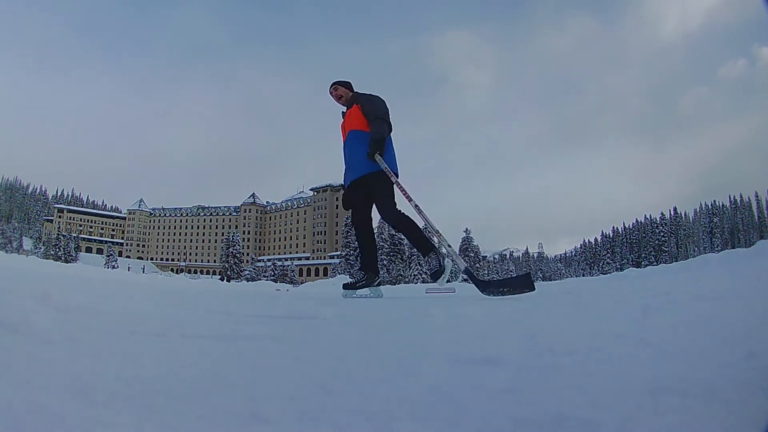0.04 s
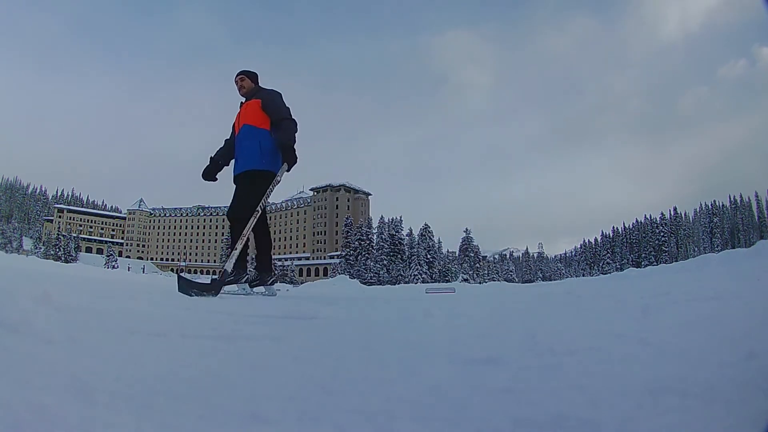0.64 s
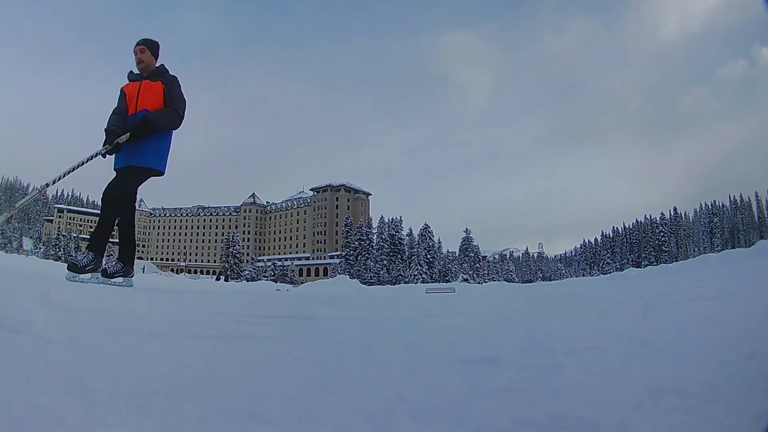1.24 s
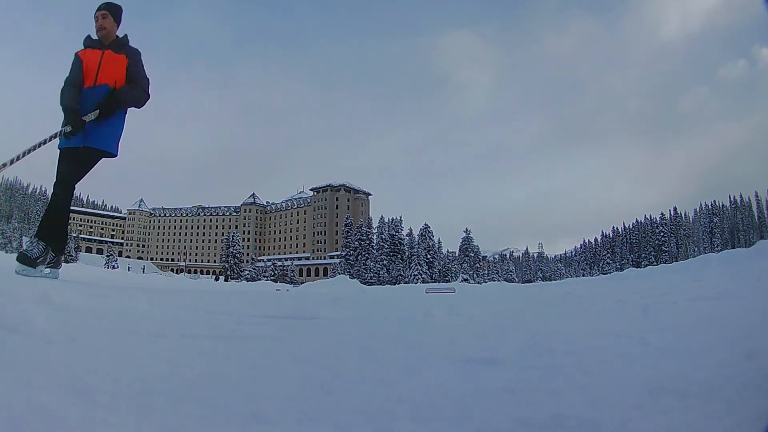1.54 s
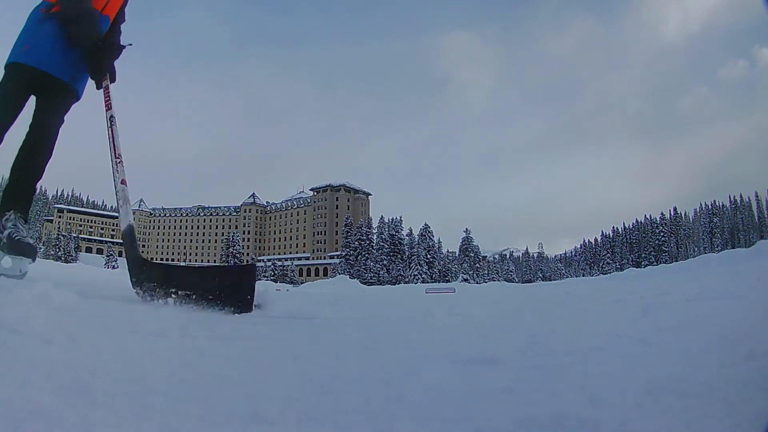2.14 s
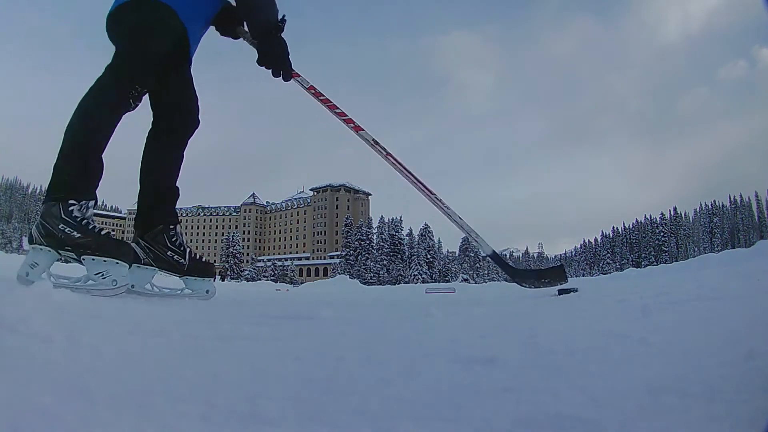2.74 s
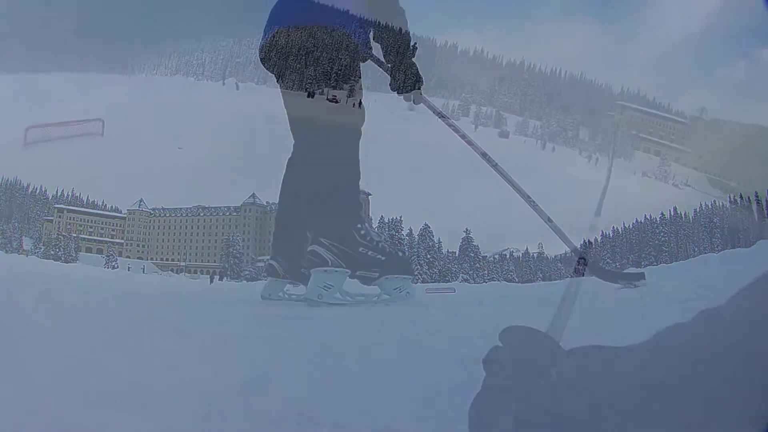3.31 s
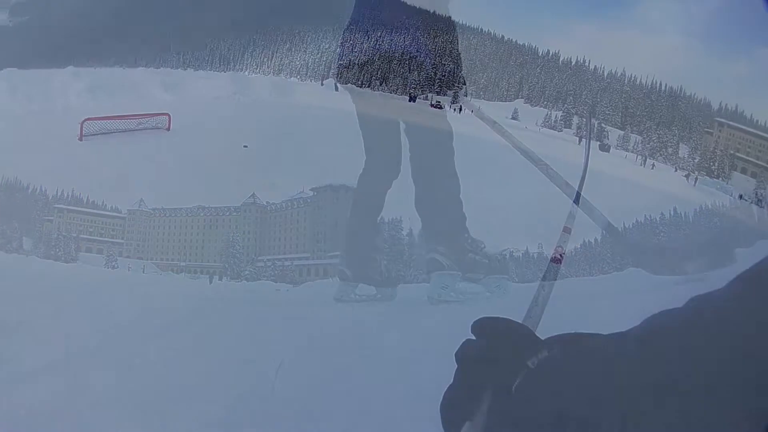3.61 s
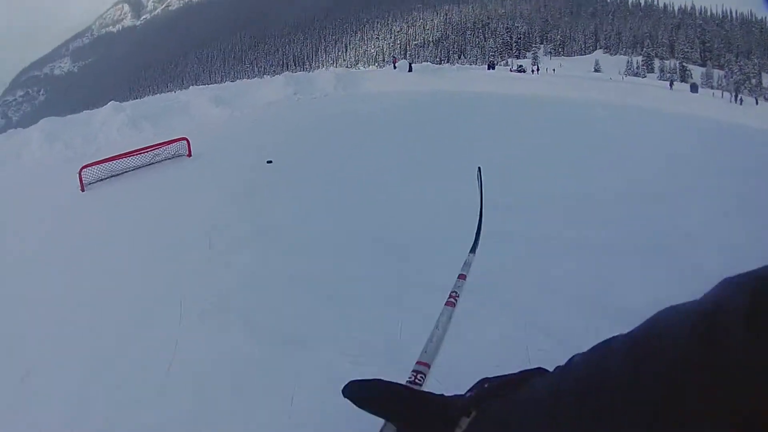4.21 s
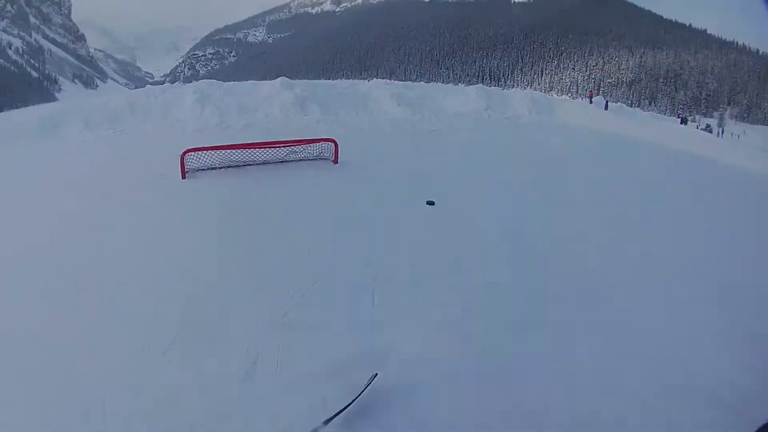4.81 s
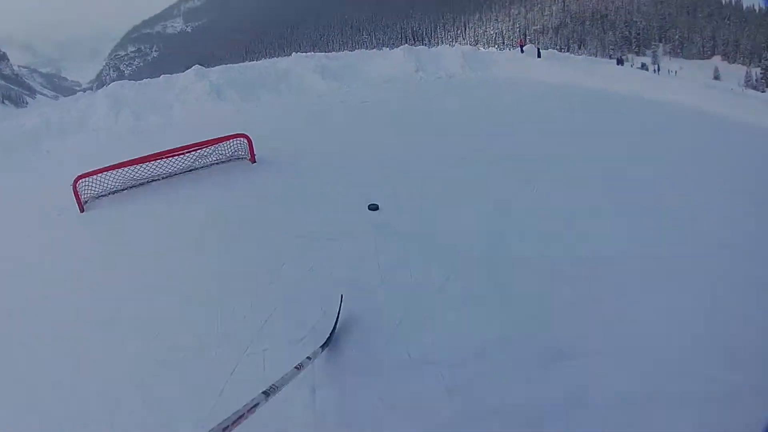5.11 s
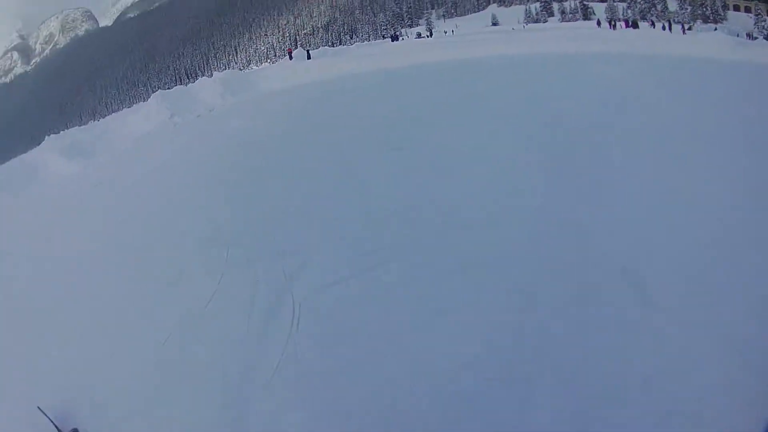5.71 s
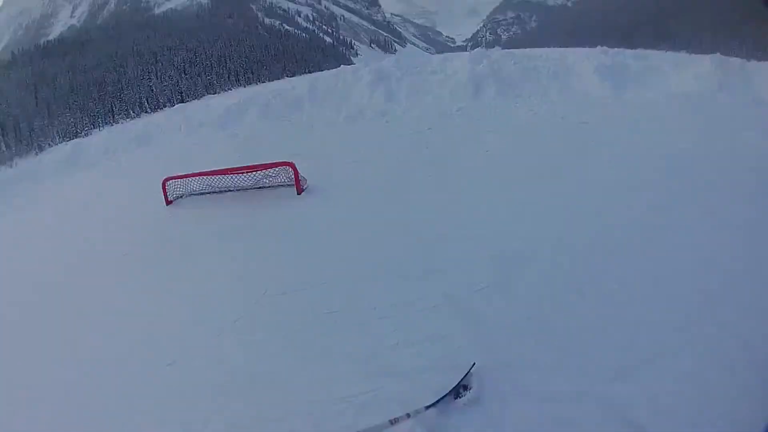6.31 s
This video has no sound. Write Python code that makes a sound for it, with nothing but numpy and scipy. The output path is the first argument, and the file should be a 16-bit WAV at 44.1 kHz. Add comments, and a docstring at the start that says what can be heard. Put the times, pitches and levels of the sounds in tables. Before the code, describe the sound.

Quiet skate scrapes and small stick and puck taps pass by, heard from ice level outdoors without any echo. The perspective then fades to the player's own position and gets much louder: a hockey stick smacks the ice and rattles, briefly overloading the microphone, while skate blades clack, crunch and carve with soft thuds, ending in two clusters of hard strides. Faint electronic hiss and a high whine run throughout.

```python
"""A hockey player's stick and skates on a frozen lake, in the open with no walls to answer.
From a camera microphone lying on the ice, the skater glides by a metre and a half off, tapping a puck.
About three seconds in, the sound dissolves to a camera worn by the player. Up close, the stick blade
slaps the ice and chatters, overloading the microphone, and the skates clack, grind and throw snow.
Both cameras hiss and whine faintly underneath."""
import sys
import numpy as np
from scipy import signal
from scipy.fft import rfft, irfft, next_fast_len
from scipy.io import wavfile
from scipy.ndimage import uniform_filter1d, map_coordinates

SR = 44100
rng = np.random.default_rng(int(sys.argv[2]) if len(sys.argv) > 2 else 0)


def put_to_file(sound):
    """Save the sound as 16-bit audio at rate SR, in the file named by the first command-line argument."""
    columns = np.atleast_2d(sound).T  # one column per channel
    safe = np.clip(columns, -1, 1)
    whole_steps = np.round(safe * 32767)
    wavfile.write(sys.argv[1], SR, whole_steps.astype(np.int16))


N = 280025
TIME = np.arange(N) / SR
AGE = np.arange(4096) / SR  # seconds since a contact
LEAD_S = .03  # an edge scrapes this long before it bites
ORDINARY_BITE_DB = -54

# The passing glide, heard from the ice: time_s, level_db
GLIDE_LEVELS = [(0.0, -73), (0.42, -64), (0.63, -57.5), (0.78, -60), (1.19, -59), (1.6, -60.5),
                (2.62, -58.5), (2.89, -58), (3.02, -63.5)]
# How hard the edges bite, heard from the player: time_s, level_db
BITE_LEVELS = [(3.66, -59), (3.75, -46), (3.85, -54.5), (3.93, -43.5), (4.02, -58), (4.42, -64.5),
               (4.66, -48), (4.87, -49.5), (5.0, -56), (5.2, -60.5), (5.55, -57), (5.77, -47),
               (5.84, -39.5), (5.91, -53.5), (6.02, -49.5), (6.1, -51.5), (6.18, -41.5), (6.34, -58)]
# Snow and ice chips at close range: frequency_hz, level_db
SPRAY_SPECTRUM = [(2000, -47), (2700, -2), (3200, 2.5), (3800, -2.5), (4350, -0.5), (4800, -9), (5500, -11),
                  (7000, -15), (12000, -30.5)]


def stick_slaps():
    """The blade hits flat and rebounds ever sooner; weaker contacts last longer and sound duller."""
    # Slaps on the ice: start_s, level_db, first_flight_s, rebound_loss_db
    slaps = [(3.409, 9, .0258, 6.6), (3.8991, 11, .0513, 4.6), (4.0592, -8, .004, 9),
             (4.683, 14, .0208, 5.9)]
    # Resonances of the stick: pitch_hz, level_db, t60_s
    stick_modes = [(220, -24, .02), (400, -20, .026), (850, -17, .025), (1115, -11, .04), (1180, 1, .007),
                   (1283, -1, .036), (1570, 0, .028), (2130, -10, .014), (2790, -16, .016),
                   (3050, -1, .013), (3360, -2, .013), (3850, -13, .018), (4075, -14, .022),
                   (4350, -17, .018), (6620, -21, .016), (9220, -10, .005)]
    rest_db, shortest_flight_s = -11, .00334
    out = np.zeros(N)
    for s, first_db, flight_s, loss_db in slaps:
        for db in np.arange(first_db, rest_db, -max(loss_db, 2)):
            push = AGE * fade(.00036 * amp(-db) ** .45)  # the force rises fast and lets go
            body = band(ring(stick_modes, detune=.002), 165, "high")
            slap = signal.fftconvolve(body / np.abs(body).max(), push / push.sum())
            add(out, s, amp(db) * slap[:len(AGE)])
            s += flight_s
            flight_s = shortest_flight_s * (flight_s / shortest_flight_s) ** .6
    return out


def skate_steps():
    """The player's skates clack down right below the worn microphone."""
    # Distinct skate strikes: start_s, level_db, crunch_db
    steps = [(3.4242, -36, -2), (3.497, -44.5, -8), (3.537, -45.5, 1), (3.74, -40, -4), (3.813, -33, -1.5),
             (4.06, -15.5, -3), (4.309, -39, -10), (4.449, -39.5, -2), (4.507, -25.5, 0.5),
             (4.805, -27.5, 2), (4.823, -23.5, -5.5), (4.865, -3, -2.5), (4.924, -34.5, 0),
             (5.061, -38, -3.5), (5.258, -39, 0.5), (5.327, -33, 0), (5.359, -34, 0.5), (5.394, -34, -6),
             (5.48, -31, -3), (5.721, -35, 1), (5.794, -23, 0), (5.808, -23.5, 3), (5.832, -13, 1.5),
             (5.863, -20, .5), (6.15, -21.5, 0), (6.19, -16.5, 2), (6.21, -7.5, 1), (6.215, -16, -1),
             (6.298, -23, -6.5), (6.306, -21.5, 6)]
    return skate_strikes(steps)


def skate_strikes(rows):
    """Each strike rings the boot, thuds under the player's weight and chips ice with the edge."""
    # Resonances of boot and blade holder: pitch_hz, level_db, t60_s
    boot_modes = [(430, 1.5, 0.0067), (978, -12.5, 0.032), (1123, -2.5, 0.026), (1260, 8, 0.0027),
                  (1273, -10.5, 0.053), (1570, 1.5, 0.012), (1906, -4, 0.024), (1950, -18, 0.02)]
    out = np.zeros(N)
    for s, db, crunch_db in rows:
        body = band(band(ring(boot_modes, detune=.012), 300, "high"), 2390, "low")
        clack = amp(db + 2) * crunch(body, crunch_db, t60=.032, scrape_db=crunch_db - 13, rise_s=.016)
        thud = unit(band(ring([(212, .93, .019), (345, 0, .02)], detune=.046), 91.3, "high"))
        chips = shaped(rng.standard_normal(len(AGE)) * fade(.025), SPRAY_SPECTRUM)
        force_db = db + 20  # above an ordinary strike; heavier means relatively more thud, fewer chips
        thud *= amp(-19 + .56 * force_db)
        chips *= amp(-22.5 - .4 * force_db)
        add(out, s - LEAD_S, clack)
        add(out, s, clack.std() * (thud + chips))
    return out


def puck_taps():
    """Stick and puck tap some metres off, among faint random skate ticks that follow the glide's level."""
    # Distinct taps: start_s, peak_db, knock_db
    taps = [(0.125, -37, -9), (0.449, -42, -20), (1.115, -41, -22), (1.387, -37, 3.5), (1.394, -36.5, -21),
            (2.034, -35.5, -20), (2.058, -34.5, -25), (2.105, -32, -26), (2.156, -31.5, -18),
            (2.464, -22.5, -31), (2.686, -42.5, -24), (2.793, -28, -29), (3.016, -40.5, -18)]
    out = np.zeros(N)
    for s, db, knock_db in taps:
        add(out, s - LEAD_S, blade_tap(db, knock_db))
    for s, strength in chance_times(per_s=4.6, start_s=.4, end_s=3.0):
        glide_db = np.interp(s, *np.transpose(GLIDE_LEVELS))
        add(out, s - LEAD_S, blade_tap(glide_db + 17 + 2.6 * strength, knock_db=-18))
    return out


def blade_tap(db, knock_db):
    """A tap rings the blade and knocks on the ice; the lighter it is, the more the tip rattles."""
    # Resonances of the tapped blade: pitch_hz, level_db, t60_s
    blade_modes = [(910, -34, 0.0052), (1098, 11, 0.04), (1196, 4.5, 0.022)]
    # Its rattling tip: pitch_hz, level_db, t60_s
    tip_modes = [(1470, 13.5, 0.0054), (1746, -3, 0.03), (2310, -19, .01), (3510, -4, 0.011)]
    blade = unit(ring(blade_modes, detune=.0046))
    tip = unit(ring(tip_modes, detune=.027))
    knock = unit(band(ring([(536, 0, .024)], detune=.04), 410, "high"))
    tip_db = min(-2 - 2.6 * (db + 30), 3)
    body = band(blade + amp(tip_db) * tip, 1090, "high") + amp(knock_db - 3) * knock
    body = band(body, 2540, "low")
    return amp(db) * crunch(body, crunch_db=-1.5, t60=.06, scrape_db=-10.5, rise_s=.024)


def crunch(body, crunch_db, t60, scrape_db, rise_s):
    """A rising scrape, the blow and a burst of tiny fractures, all ringing the same body; peak 1."""
    scrape = (rng.standard_normal(len(AGE)) * fade(rise_s))[:round(LEAD_S * SR)][::-1]
    burst = rng.standard_normal(len(AGE)) * fade(t60)
    burst *= amp(crunch_db) / np.linalg.norm(burst)
    burst[0] = 1  # the blow itself
    force = np.concatenate([amp(scrape_db) * scrape / np.linalg.norm(scrape), burst])
    hit = signal.fftconvolve(force, body)[:len(AGE)]
    return hit / np.abs(hit).max()


def grinding_edges():
    """Blades grind over rough ice up close; a harder bite throws more snow and shakes the camera more."""
    # Steel grinding on ice: frequency_hz, level_db
    grind_spectrum = [(350, -24), (650, 0), (880, 3.5), (1000, -3.5), (1120, 2), (1290, 4), (1420, -4.5),
                      (1580, 7), (1780, -5.5), (2150, 0), (2500, -15), (4000, -60)]
    # Shake of the worn camera: frequency_hz, level_db
    shake_spectrum = [(20, 10), (50, 4), (110, 1.5), (190, 5.5), (290, -1.5), (380, -7.5), (520, -13),
                      (900, -44)]
    grind_gain, = gains(BITE_LEVELS)
    bite = grind_gain / amp(ORDINARY_BITE_DB)
    shake_gain = amp(-52.5) * bite ** .52
    snow_gain = amp(-65.5 + 2 * (TIME - 4.92)) * bite ** .83  # rises as the player gathers speed
    roughness = wobble(45)
    scrape = shaped(grains(per_s=300, spread_db=.5, friction=.86), grind_spectrum)
    scrape = patchy(scrape, depth_db=3) * amp(2.9 * roughness)
    snow = shaped(grains(per_s=590, spread_db=3.5, friction=.7), SPRAY_SPECTRUM)
    snow = patchy(snow, depth_db=5) * amp(2.5 * roughness)
    shake = shaped(rng.standard_normal(N), shake_spectrum) * amp(1.3 * roughness + 1.1 * wobble(24))
    return grind_gain * scrape + snow_gain * snow + shake_gain * shake


def stride_bumps():
    """Soft jolts reach the worn microphone through the player's body."""
    # Dull bumps of the stride: start_s, level_db
    jolts = [(4.117, -32), (4.669, -25.5), (4.84, -25), (5.076, -36), (5.306, -33), (5.615, -35),
             (5.838, -21.5), (5.854, -25.5), (6.054, -26.5), (6.21, -17.5)]
    out = np.zeros(N)
    for s, db in jolts:
        bump = band(ring([(200.4, -6, .068), (240, -9.5, .031)], detune=.075), 480, "low")
        add(out, s, amp(db - 3) * bump / np.abs(bump).max())
    return out


def ruts():
    """Small ruts strike the player's blades at random, harder where the edges bite."""
    rows = []
    for s, strength in chance_times(per_s=6.1, start_s=3.5, end_s=6.2):
        bite_db = np.interp(s, *np.transpose(BITE_LEVELS)) - ORDINARY_BITE_DB
        rows.append((s, -39.5 + .3 * bite_db + .5 * strength, -2))
    return skate_strikes(rows)


def passing_skater():
    """Blades glide past the microphone in little resonant scrapes; their spray carries only close by."""
    # Gliding steel: frequency_hz, level_db
    glide_spectrum = [(400, -38.5), (800, -14), (1080, 7.5), (1400, -1.5), (1900, 6), (2300, -9.5),
                      (2700, -15), (4000, -52)]
    # Fine spray a few metres off: frequency_hz, level_db
    far_spray_spectrum = [(1800, -15), (2300, 3.5), (2900, -7.5), (3500, -1), (4150, 1), (4800, -11.5),
                          (5500, -3), (6500, -17), (9500, -8), (13000, -20)]
    pass_s, nearest_m, speed_m_per_s = 2.08, 1.42, 2.87
    glide_gain, = gains(GLIDE_LEVELS)
    distance_m = np.hypot(nearest_m, speed_m_per_s * (TIME - pass_s))
    roughness = amp(1.9 * wobble(39.64))
    scrape = patchy(shaped(grains(per_s=390, spread_db=2, friction=1), glide_spectrum), depth_db=4.5)
    snow = patchy(shaped(grains(per_s=1500, spread_db=1, friction=1), far_spray_spectrum), depth_db=4.5)
    return roughness * glide_gain * (amp(-2.5) * scrape + amp(-2) * snow / distance_m)


def singing_edges():
    """On a long, clean glide the steel runner sings in one narrow resonance."""
    # Singing glides: start_s, end_s, pitch_hz, level_db
    glides = [(0.181, 0.545, 4140, -69.5), (5.024, 5.496, 4250, -70)]
    out = np.zeros(N)
    for start, end, hz, db in glides:
        swell = signal.windows.tukey(round((end - start) * SR), .6)
        resonance = signal.iirpeak(hz, Q=10, fs=SR)
        friction = rng.standard_normal(len(swell))
        tone = signal.lfilter(*resonance, signal.lfilter(*resonance, friction))
        add(out, start, amp(db) * swell * unit(tone))
    return out


def camera_noise(peaks_db):
    """Low air noise, electronic hiss and a thin whine that pauses briefly in every flutter cycle."""
    # Air and electronic noise floor: frequency_hz, level_db
    hiss_spectrum = [(20, 3), (60, 0), (130, -4.5), (370, -9), (700, -16), (1200, -14), (2000, -27.5),
                     (2900, -24.5), (7000, -29), (10000, -27), (12500, -28), (14000, -26.5), (15700, -22)]
    # Narrow humps in the hiss: centre_hz, width_hz, boost_db
    hiss_peaks = [(4170, 81, 3), (5420, 100, 8.5), (11020, 260, 10.5)]
    whine_hz, flutter_hz = 13750, 52.5

    def hiss_db(hz):
        humps = sum(db * np.exp(-.5 * ((hz - centre) / width) ** 2) for centre, width, db in hiss_peaks)
        return along(hiss_spectrum, hz) + amp(peaks_db) * humps

    hiss = unit(coloured(rng.standard_normal(N), hiss_db))
    running = uniform_filter1d(1.0 * (TIME * flutter_hz % 1 < .74), size=60)
    whine = running * np.sin(2 * np.pi * whine_hz * TIME)
    return amp(-57.5) * hiss + amp(-60) * unit(whine)


def overload(x):
    """The microphone flattens every peak above its ceiling."""
    return np.clip(x, -.57, .57)


def ring(modes, detune):
    """Damped modes (pitch_hz, level_db, t60_s), excited a little differently by each blow."""
    chance = rng.standard_normal((len(modes), 2))
    return sum(amp(db + extra_db) * fade(t60) * np.sin(2 * np.pi * hz * (1 + detune * shift) * AGE)
               for (hz, db, t60), (extra_db, shift) in zip(modes, chance))


def grains(per_s, spread_db, friction):
    """Ice crystals breaking at random, over a share of smooth friction."""
    cracks = (rng.random(N) < per_s / SR) * rng.standard_normal(N)
    cracks *= amp(spread_db * np.clip(rng.standard_normal(N), -2, 2))
    return unit(cracks) + friction * rng.standard_normal(N)


def patchy(x, depth_db):
    """Uneven ice: brief patches of random gain in time and pitch; rms 1."""
    spectra = signal.stft(x, nperseg=256)[2]
    patches = uniform_filter1d(rng.standard_normal(spectra.shape), size=3, axis=0)
    patches = uniform_filter1d(patches, size=7, axis=1)
    return unit(signal.istft(spectra * amp(depth_db * unit(patches)), nperseg=256)[1][:N])


def chance_times(per_s, start_s, end_s):
    """One random moment in each time slot, paired with a random strength of unit spread."""
    slots = np.arange(start_s, end_s, 1 / per_s)
    chance = rng.random((128, 2))[:len(slots)]
    return zip(slots + chance[:, 0] / per_s, np.sqrt(12) * (chance[:, 1] - .5))


def wobble(per_s):
    """A smooth random curve with per_s knots a second."""
    return map_coordinates(rng.standard_normal(int(N * per_s / SR) + 4), [TIME * per_s])


def coloured(x, db_at):
    """x through the causal filter whose gain in dB is db_at(hz)."""
    size = 2 * next_fast_len(len(x))
    cepstrum = irfft(np.log(amp(db_at(np.fft.rfftfreq(size, 1 / SR)))), size)
    cepstrum[1:size // 2] *= 2  # fold to minimum phase
    cepstrum[size // 2 + 1:] = 0
    return irfft(rfft(x, size) * np.exp(rfft(cepstrum)), size)[:len(x)]


def shaped(x, spectrum):
    """x filtered by the given spectrum, at rms 1."""
    return unit(coloured(x, lambda hz: along(spectrum, hz)))


def along(spectrum, hz):
    """A spectrum's level at hz, read on a log axis."""
    knots_hz, db = np.transpose(spectrum)
    return np.interp(np.log(hz + 1), np.log(knots_hz + 1), db)


def band(x, hz, kind):
    """A second-order low-pass or high-pass."""
    return signal.sosfilt(signal.butter(2, hz, kind, fs=SR, output="sos"), x)


def gains(rows):
    """One gain per sample for each dB column after the time."""
    times, *columns = np.transpose(rows)
    return [amp(np.interp(TIME, times, db)) for db in columns]


def fade(t60):
    """Decay by 60 dB in t60 seconds."""
    return np.exp(-np.log(1000) * AGE / t60)


def amp(db):
    """Decibels to gain."""
    return 10 ** (np.asarray(db) / 20)


def unit(x):
    """Scale to rms 1."""
    return x / np.sqrt(np.mean(x ** 2) + 1e-20)


def add(track, s, sound):
    """Mix a sound in at s seconds."""
    part = track[round(s * SR):][:len(sound)]
    part += sound[:len(part)]


def scene():
    """The microphone on the ice dissolves into the one on the player; mono."""
    # Crossfade between the two positions: time_s, on_ice_db, worn_db
    dissolve = [(2.7, 0, -70), (3.0, 0, -40), (3.41, -12, -20), (3.65, -20, -11.5), (3.9, -45, -1.5),
                (3.96, -70, 0)]
    ice_gain, worn_gain = gains(dissolve)
    on_ice = passing_skater() + puck_taps() + amp(-.63) * camera_noise(peaks_db=0)
    player = stick_slaps() + grinding_edges() + ruts() + stride_bumps()
    worn = overload(player + amp(-.74) * camera_noise(peaks_db=-.5))
    return (ice_gain * on_ice + worn_gain * worn + overload(skate_steps()) + singing_edges())[None]


def record(dry):
    """Nothing is kept above the band limit."""
    top_hz = 15900
    size = next_fast_len(N + SR // 2)
    passband = np.fft.rfftfreq(size, 1 / SR) < top_hz
    return irfft(rfft(dry, size) * passband, size)[..., :N]


dry = scene()
out = record(dry)
put_to_file(out)
```